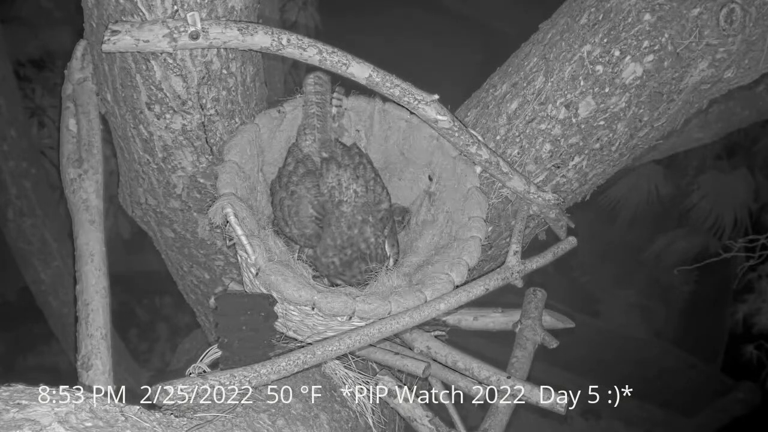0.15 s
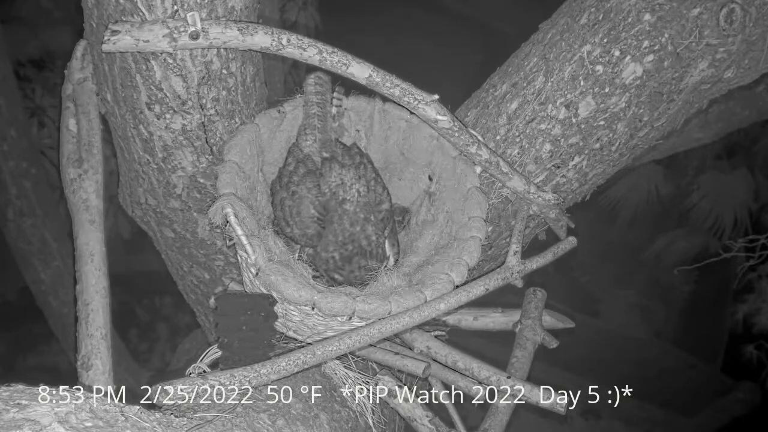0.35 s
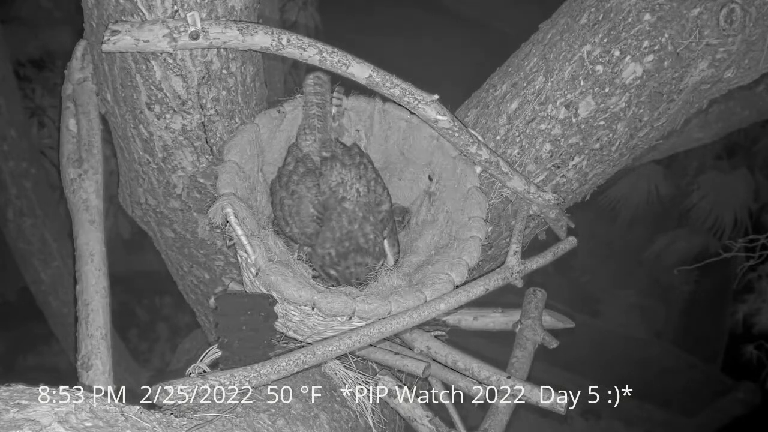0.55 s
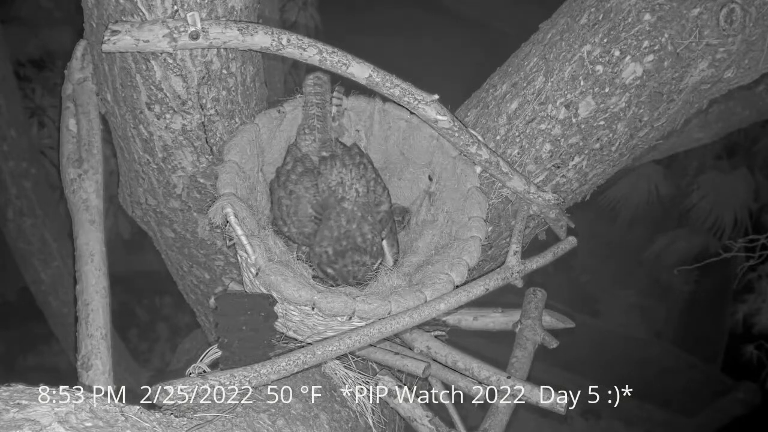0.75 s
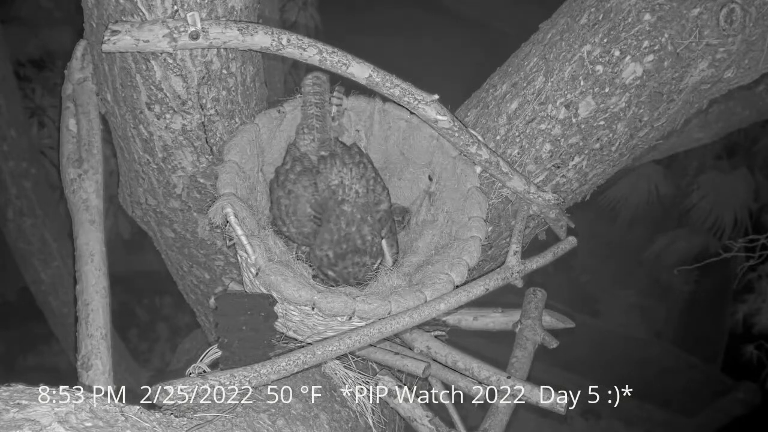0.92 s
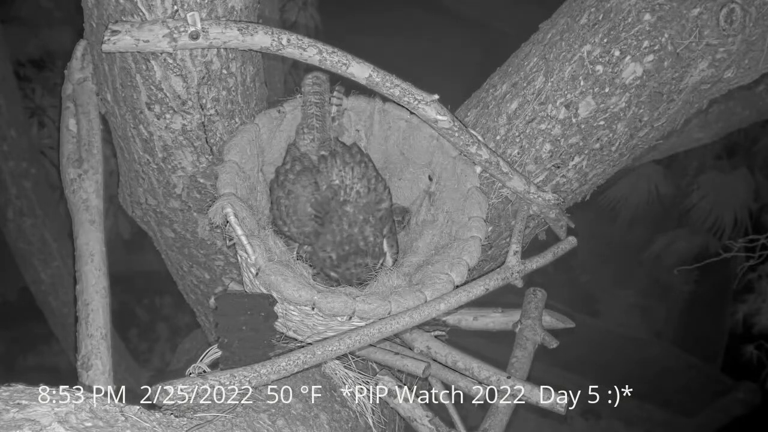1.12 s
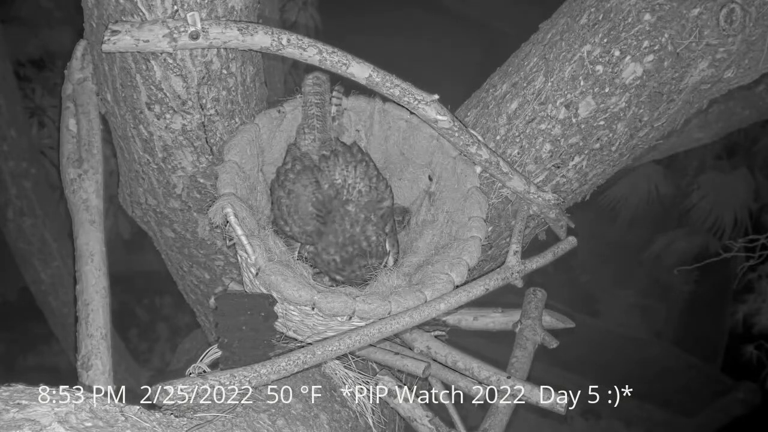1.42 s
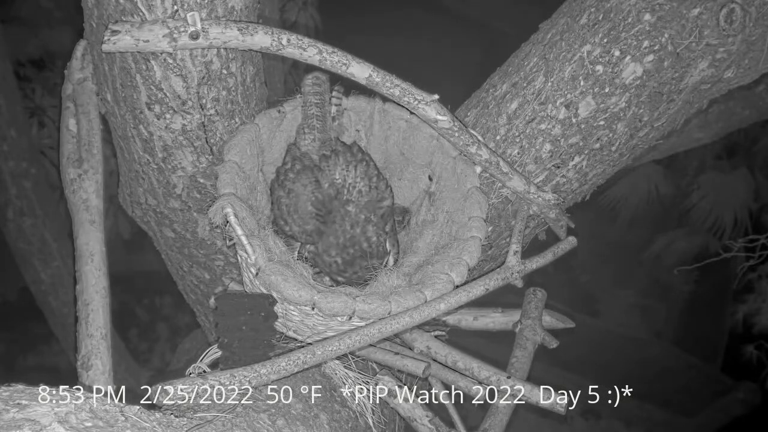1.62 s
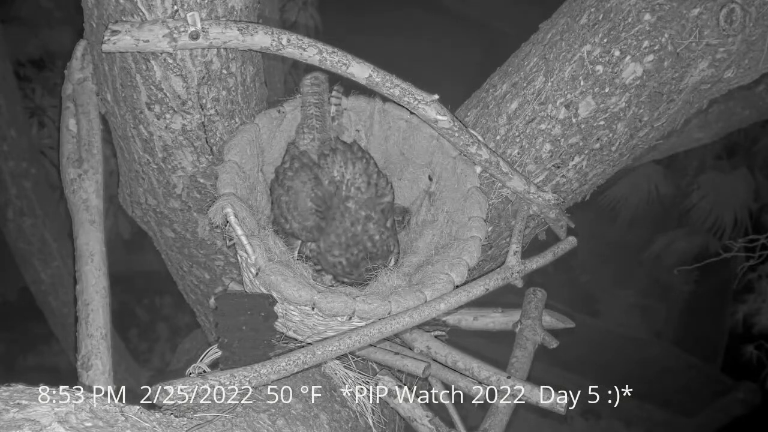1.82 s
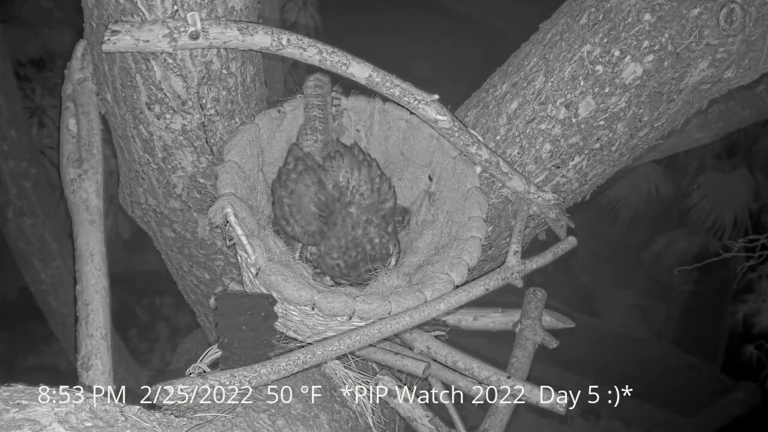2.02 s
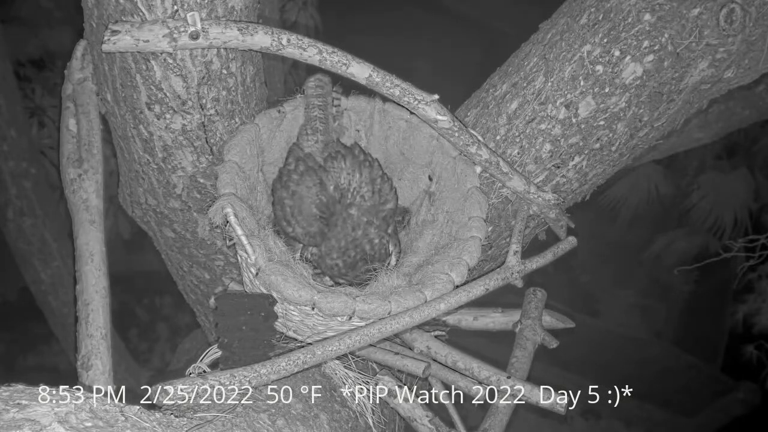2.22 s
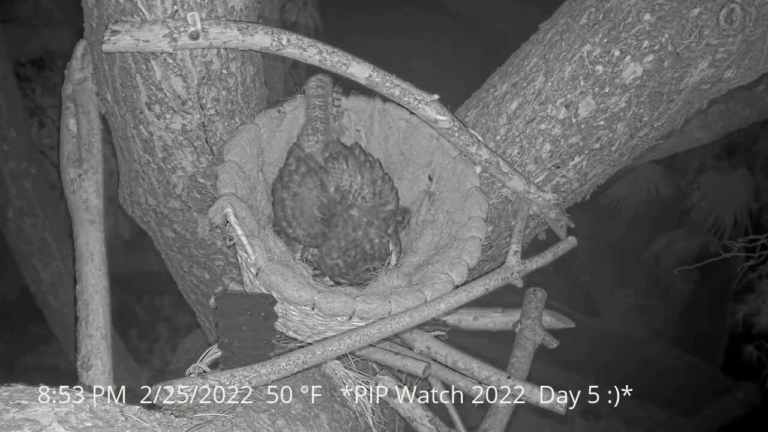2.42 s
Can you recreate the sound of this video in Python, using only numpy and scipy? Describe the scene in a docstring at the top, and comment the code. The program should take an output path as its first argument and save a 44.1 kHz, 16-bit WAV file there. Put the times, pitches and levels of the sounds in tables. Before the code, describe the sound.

An owl gives six short, low, evenly spaced hoots at night over a faint wavering hum

```python
"""An owl gives six short low hoots at night, close to an outdoor camera: harmonics on an arching, sagging pitch.
Each hoot ends in three lone creaky pulses ringing in two throat resonances.
Behind it a low hum and its octave waver, as two sines, and soft puffs of filtered noise rustle and tick.
Shaped noise makes the distant rumble, the microphone hiss and a patchy stir in the lower treble."""
import sys
import numpy as np
from scipy import signal
from scipy.fft import rfft, irfft, next_fast_len
from scipy.io import wavfile
from scipy.ndimage import uniform_filter1d, map_coordinates

SR = 44100
rng = np.random.default_rng(int(sys.argv[2]) if len(sys.argv) > 2 else 0)


def elevation(decibels):
    """Turn decibel levels (scalar or array-like) into linear amplitude ratios."""
    levels = np.asarray(decibels, float)
    return 10 ** (levels / 20)


def store_wav(level_fs):
    """Save 16-bit WAV to argv[1]."""
    pcm = np.round(np.clip(np.atleast_2d(level_fs), -1, 1) * 32767)
    wavfile.write(sys.argv[1], SR, pcm.T.astype(np.int16))


N = 112454

# hoots: (start [s], length of voiced body [s], top pitch [Hz], nominal level [dB])
HOOTS = [(.207, .0483, 256, -42), (.523, .0399, 245, -42), (.852, .0433, 252, -41.5),
         (1.188, .0352, 231, -43), (1.520, .0403, 243, -41.5), (1.833, .0372, 234, -42.5)]
# pitch arch of one hoot: (share of body [1], pitch over top pitch [1])
PITCH_ARCH = [(-.08, .9), (.1, .945), (.28, .985), (.42, 1.0), (.6, .98), (.8, .93), (1.0, .81),
              (1.15, .72), (1.45, .66)]
# effort of one hoot: (share of body [1], level re nominal [dB], overtone gain [dB])
EFFORT = [(-.12, -39.5, -5), (.02, -7.5, -4.5), (.22, -0.5, -3.5), (.45, -0.9, -1.4), (.7, 0.5, 0),
          (.88, 2, -7), (1.05, -9.5, -17), (1.2, -18.5, -15), (1.45, -31, -12)]
# overtones: (multiple of the pitch [1], level re fundamental before overtone gain [dB])
OVERTONES = [(2, -7.5), (3, -17.5), (4, -30)]
# creak pulses as the voice stalls: (delay after body end [s], relative drive [dB])
CREAK_PULSES = [(0.0, -4), (.0057, -3.5), (0.0137, -5)]
# throat resonances, rung by the creak: (centre [Hz], width [Hz], gain [dB])
THROAT = [(271.5, 160, -1.4), (553, 160, 3.5)]
# hum levels: (time [s], fundamental rms [dB], octave rms [dB])
HUM_LEVELS = [(0, -66.5, -56), (.3, -63.5, -57.5), (0.751, -63.5, -67.5), (1.0, -64.5, -62),
              (1.4, -57.5, -58.5), (1.8, -63, -61), (2.3, -59.5, -56.5), (2.55, -61.5, -59.5)]
# faint rustles and ticks nearby: (start [s], onset rms [dB], centre [Hz], width [Hz], t60 [s])
RUSTLES = [(0.026, -71, 3280, 1500, 0.28), (1.6, -73, 2880, 400, 0.36), (1.862, -71.5, 5200, 2500, .06),
           (1.929, -72.5, 5650, 1500, 0.34), (2.135, -70, 2500, 300, .12), (2.262, -73, 2900, 350, 0.1),
           (2.308, -75, 2150, 250, 0.13)]
# distant rumble spectrum: (frequency [Hz], relative density [dB per Hz])
RUMBLE_SPECTRUM = [(8.8, -27.5), (15, 9.5), (38, -5.5), (70, -6), (110, -3.5), (160, -8.5), (240, -10.5),
                   (400, -18.5), (510, -15), (660, -17.5), (920, -16), (1150, -22.5), (1700, -38.5),
                   (2210, -70), (3740, -120)]
# microphone hiss spectrum: (frequency [Hz], relative density [dB per Hz])
HISS_SPECTRUM = [(760, -27.5), (1300, -9), (1950, -3.5), (2500, -8.5), (3000, -5), (4500, -8.5),
                 (5000, -10), (5840, -9), (7200, -13), (8000, -19.5), (10000, -25.5), (15400, -33),
                 (16500, -34)]
# lower-treble stir spectrum, perhaps leaves: (frequency [Hz], relative density [dB per Hz])
STIR_SPECTRUM = [(700, -59.5), (1300, -3), (2000, 0.1), (3000, -3), (4200, -7.5), (6500, -15.5),
                 (9000, -60)]

JITTER, SHIMMER_DB = 0.012, 0.5  # jitter is a fraction of the pitch
LEAN_RAD, LEAN_RAD_PER_HZ = 1.0, -0.025
BRIGHT_DB_PER_HZ = 0.1264  # higher hoots are brighter
CREAK_DRIVE_DB, CREAK_SPREAD_DB = 8, 2.2
CREAK_SCATTER_S, CREAK_SIGMA_S = 0.00033, 0.00052
HUM_HZ, HUM_DRIFT_HZ, HUM_WAVER_DB = 87.4, 0.7, 0.5
RUMBLE_DB, HISS_DB = -54.5, -73.5
STIR_DB, STIR_WAVER_DB = -80, 1.5


def unit(x):
    """Scales x to rms 1."""
    return x / np.sqrt(np.mean(x ** 2) + 1e-20)


def wobble(rate_hz):
    """Smooth random curve through rate_hz normal knots a second."""
    knots = rng.standard_normal(int(N * rate_hz / SR) + 4)
    return map_coordinates(knots, [np.arange(N) * rate_hz / SR])


def filtered(x, response):
    """Multiplies the spectrum of x by a complex response of frequency."""
    size = next_fast_len(N + SR // 2)
    freq_hz = np.fft.rfftfreq(size, 1 / SR)
    return irfft(rfft(x, size) * response(freq_hz), size)[:N]


def resonance(freq_hz, centre_hz, width_hz):
    """Response of one causal second-order resonance."""
    damping = 1j * freq_hz * width_hz
    return damping / (centre_hz * centre_hz - freq_hz * freq_hz + damping + 1e-9)


def coloured_noise(spectrum, patchy_db, window):
    """Shaped noise of rms 1 with time-frequency patches of random gain."""
    cells = signal.stft(rng.standard_normal(N + 4096), nperseg=window)[2]
    field = uniform_filter1d(rng.standard_normal(cells.shape), size=8, axis=0)
    field = uniform_filter1d(field, size=10, axis=1)
    patchy = signal.istft(cells * elevation(patchy_db * unit(field)), nperseg=window)[1][:N]
    knot_hz, knot_db = np.transpose(spectrum)
    return unit(filtered(patchy, lambda hz: elevation(np.interp(np.log(hz + 1), np.log(knot_hz + 1), knot_db))))


def owl():
    """A clean voice arches and sags, duller as it tires; lone pulses then ring in the throat."""
    t_s = np.arange(N) / SR
    voice, creak_drive = np.zeros(N), np.zeros(N)
    share, effort_db, overtone_db = np.transpose(EFFORT)
    jitter = 1 + JITTER * wobble(120)
    shimmer = elevation(SHIMMER_DB * wobble(150))
    mean_hz = np.mean([row[2] for row in HOOTS])
    for start_s, length_s, top_hz, hoot_db in HOOTS:
        first = round((start_s + share[0] * length_s) * SR)
        last = round((start_s + share[-1] * length_s) * SR)
        on = slice(first, last)
        u = (t_s[on] - start_s) / length_s  # share of the body
        pitch_hz = top_hz * np.interp(u, *np.transpose(PITCH_ARCH)) * jitter[on]
        phase = 2 * np.pi * np.cumsum(pitch_hz) / SR
        phase += np.pi - np.interp(1, u, phase)  # a crest falls on the end of the body
        above_mean_hz = top_hz - mean_hz
        lean_rad = LEAN_RAD + LEAN_RAD_PER_HZ * above_mean_hz  # overtones lag, more in low hoots
        upper = sum(elevation(db) * np.cos(k * phase - lean_rad * (k - 1)) for k, db in OVERTONES)
        bright = elevation(np.interp(u, share, overtone_db) + BRIGHT_DB_PER_HZ * above_mean_hz)
        level = np.sqrt(2) * elevation(hoot_db + np.interp(u, share, effort_db)) * shimmer[on]
        voice[on] -= level * (np.cos(phase) + bright * upper)
        for delay_s, pulse_db in CREAK_PULSES:
            at_s = start_s + length_s + delay_s + CREAK_SCATTER_S * rng.standard_normal()
            drive_db = hoot_db + pulse_db + CREAK_DRIVE_DB + CREAK_SPREAD_DB * rng.standard_normal()
            creak_drive += elevation(drive_db) * np.exp(-0.5 * ((t_s - at_s) / CREAK_SIGMA_S) ** 2)
    creak = filtered(creak_drive, lambda f: sum(elevation(db) * resonance(f, hz, w) for hz, w, db in THROAT))
    return voice + creak


def hum():
    """Fundamental and octave share one drifting phase; their levels waver separately."""
    t_s = np.arange(N) / SR
    knot_s, *levels_db = np.transpose(HUM_LEVELS)
    phase = 2 * np.pi * np.cumsum(HUM_HZ + HUM_DRIFT_HZ * wobble(2.91)) / SR
    out = np.zeros(N)
    for multiple, knot_db in enumerate(levels_db, start=1):
        level_db = np.interp(t_s, knot_s, knot_db) + HUM_WAVER_DB * wobble(7.72)
        out += np.sqrt(2) * elevation(level_db) * np.sin(multiple * phase + rng.uniform(0, 2 * np.pi))
    return out


def rustles():
    """Band-limited noise puffs start abruptly and decay exponentially."""
    t_s = np.arange(N) / SR
    out = np.zeros(N)
    for start_s, level_db, centre_hz, width_hz, t60_s in RUSTLES:
        noise = unit(filtered(rng.standard_normal(N), lambda f: resonance(f, centre_hz, width_hz) ** 2))
        decay_db = 60 * np.clip(t_s - start_s, 0, None) / t60_s
        out += noise * (t_s > start_s) * elevation(level_db - decay_db)
    return out


def stir():
    """Strongly patchy lower-treble noise, its level wavering."""
    return elevation(STIR_DB + STIR_WAVER_DB * wobble(17)) * coloured_noise(STIR_SPECTRUM, patchy_db=5, window=512)


def rumble():
    """Distant, nearly steady low-frequency noise."""
    return elevation(RUMBLE_DB) * coloured_noise(RUMBLE_SPECTRUM, patchy_db=0.5, window=1024)


def hiss():
    """Smooth microphone noise."""
    return elevation(HISS_DB) * coloured_noise(HISS_SPECTRUM, patchy_db=0.9, window=512)


def scene():
    """Sums all sources at one microphone."""
    return (owl() + hum() + rustles() + stir() + rumble() + hiss())[None]


def top_cut(x):
    """Nothing passes above the cut-off."""
    return signal.sosfilt(signal.butter(12, 15600, fs=SR, output="sos"), x)


def record(dry):
    """Passes the finished mix through the camera."""
    return top_cut(dry)


dry = scene()
out = record(dry)
store_wav(out)
```